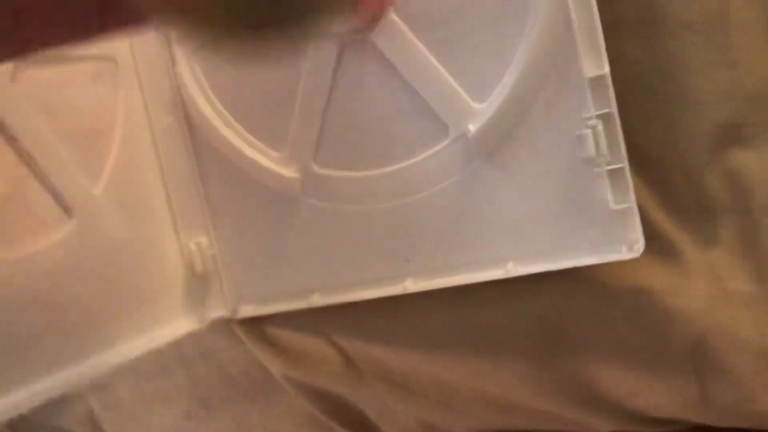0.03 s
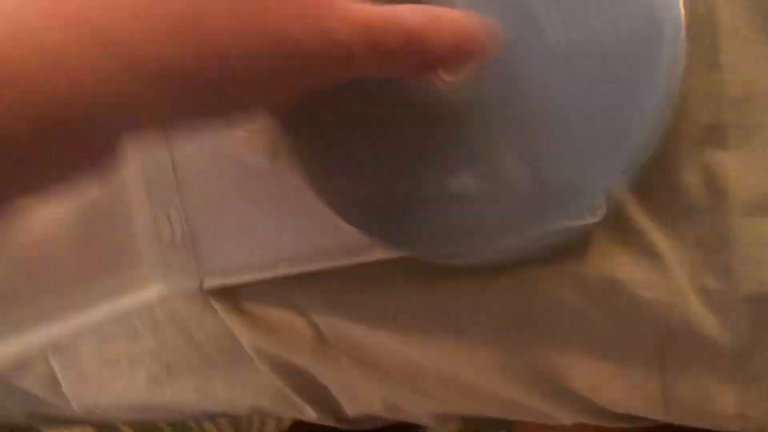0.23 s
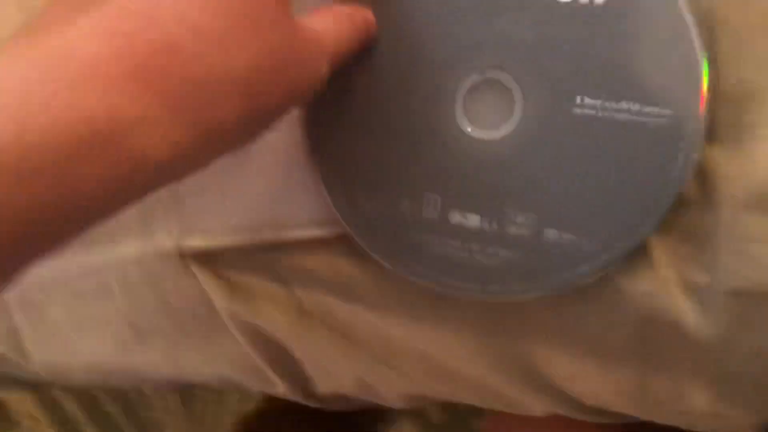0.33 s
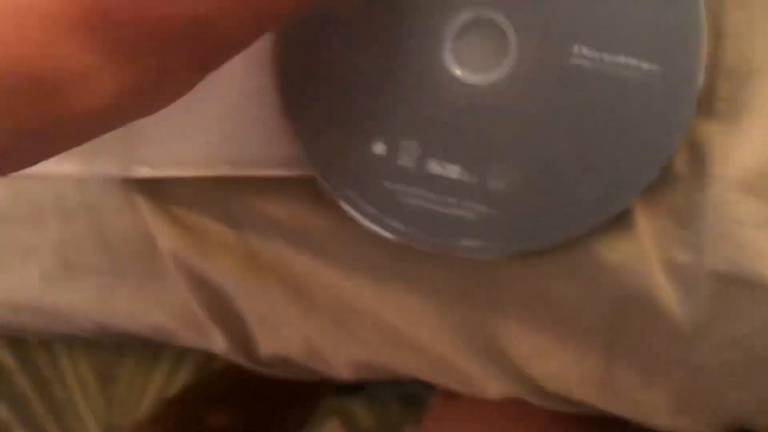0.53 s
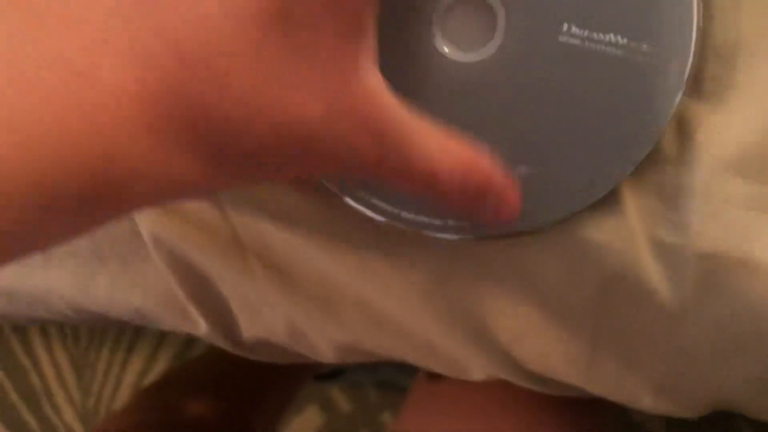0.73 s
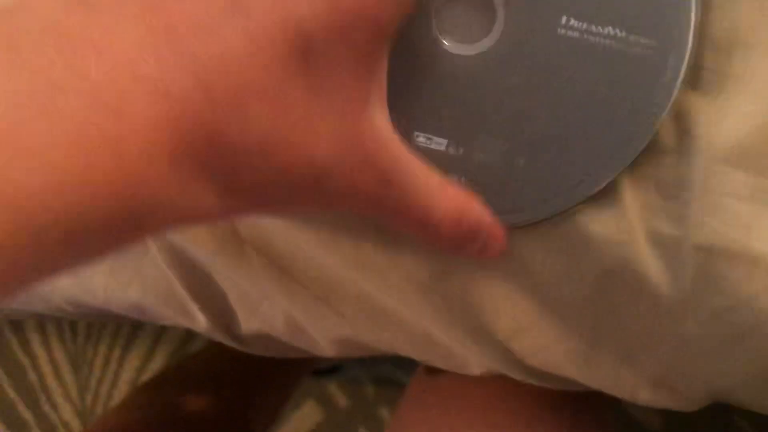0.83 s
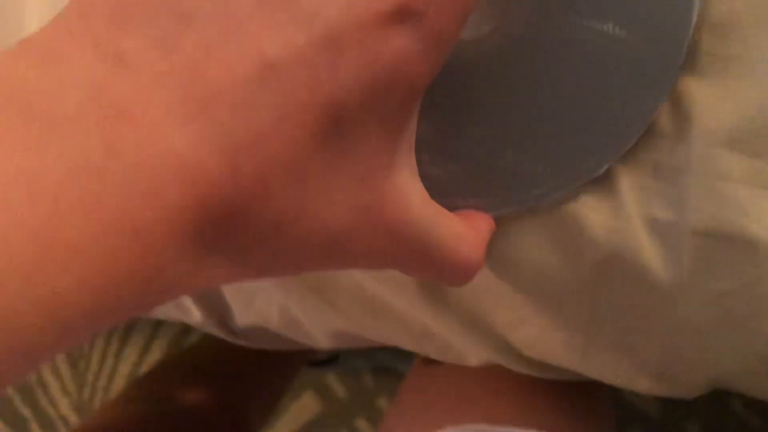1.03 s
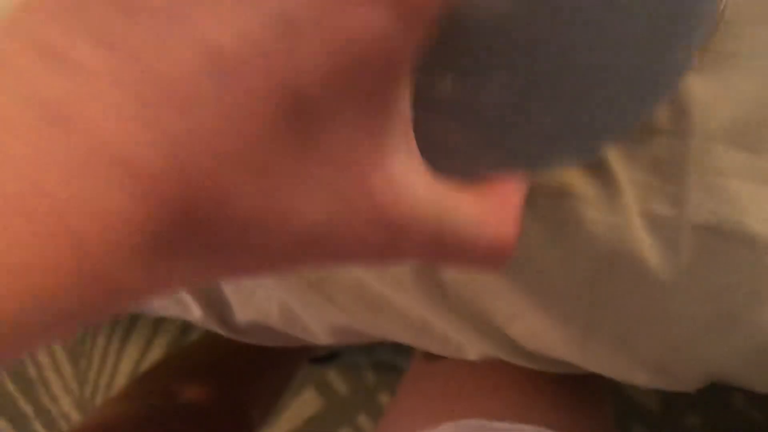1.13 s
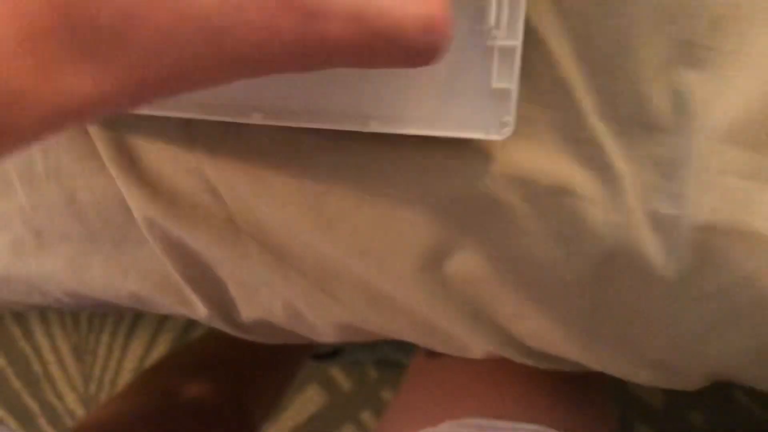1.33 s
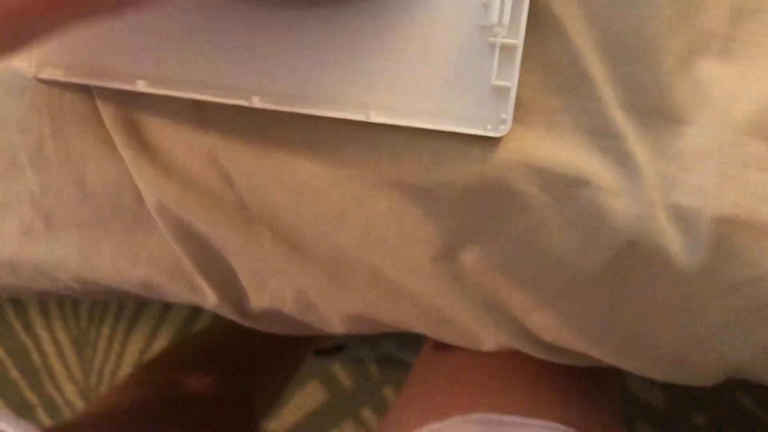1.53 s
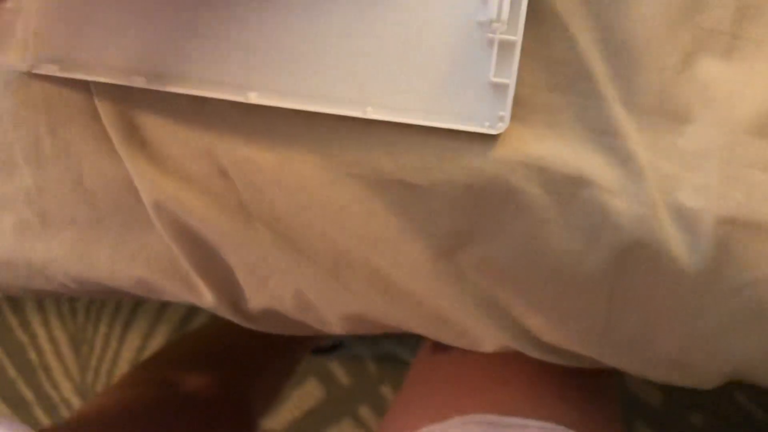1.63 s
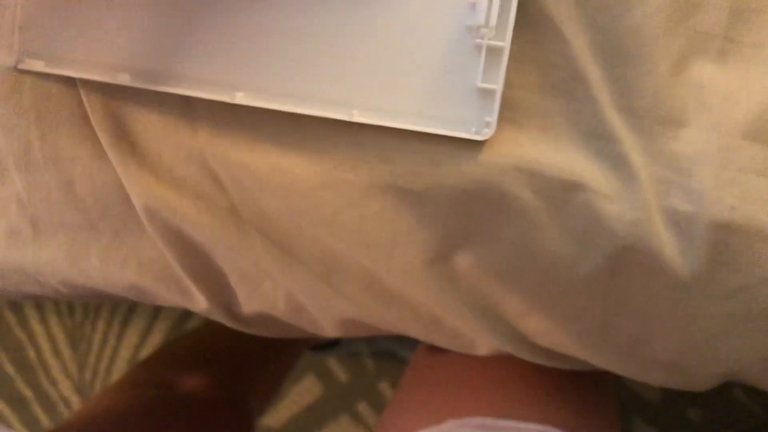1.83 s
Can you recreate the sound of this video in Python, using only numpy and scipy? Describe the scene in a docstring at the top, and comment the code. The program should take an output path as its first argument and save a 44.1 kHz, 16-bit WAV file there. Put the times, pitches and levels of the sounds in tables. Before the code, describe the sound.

A disc snaps out of a plastic case, then is pressed back with crunchy clicks.

```python
"""The hub of an open plastic case lets go of a disc with one sharp snap as a hand pulls it off.
The hub's teeth spring out and buzz, the freed disc rings, and the tray rattles and bumps on a bed.
A second later the disc is pressed back with two crunchy clicks. Fingers tap and slide over the case,
close to the microphone, in a small, quiet room with a faint mains hum."""
import sys
import numpy as np
from scipy import signal
from scipy.fft import rfft, irfft
from scipy.io import wavfile

SR = 44100
rng = np.random.default_rng(int(sys.argv[2]) if len(sys.argv) > 2 else 0)


def waveform_to_disk(signal):
    """Save audio, clipped to [-1, 1], as 16-bit WAV at the path in sys.argv[1]."""
    frames = np.transpose(np.atleast_2d(signal))
    scaled = np.clip(frames, -1, 1) * 32767
    samples = np.round(scaled).astype(np.int16)
    wavfile.write(sys.argv[1], SR, samples)


N = 83790
TIME = np.arange(N) / SR
HIT_TIME = TIME[:SR // 2]

# room noise spectrum: f/Hz, level/dB
AIR_SPECTRUM = [(25, -25), (50, -7.5), (120, -7), (250, -10.5), (450, -14.5), (700, -23), (1300, -29.5),
                (3000, -36.5), (7000, -38.5), (16000, -44)]
# mains hum partials: f/Hz, level/dB
HUM_PARTIALS = [(59, -74), (119, -67.5)]
# fingers and disc sliding on the case: t/s, length/s, level/dB, tilt/(dB/oct)
SLIDE_STROKES = [(-.03, .1, -65.5, -1.5), (0.059, 0.053, -55, 4.5), (0.104, 0.079, -52, -0.5),
                 (0.168, 0.088, -55, 1.5), (0.179, 0.029, -48, 0.5), (0.286, 0.098, -56.5, -0.5),
                 (0.381, 0.064, -57.5, 2.5), (0.814, 0.15, -65.5, 0.5), (0.912, 0.041, -59.5, -0.5),
                 (0.971, 0.058, -67, -0.5), (1.044, 0.047, -70, 2.5), (1.099, 0.17, -76.5, 3),
                 (1.219, 0.19, -66.5, 1.5), (1.478, 0.052, -51.5, -5), (1.546, 0.2, -68, 3),
                 (1.602, 0.025, -42.5, -2), (1.641, 0.017, -48.5, -6), (1.622, 0.062, -68, 1.5),
                 (1.434, .06, -59.5, 0), (1.745, 0.068, -54, -3), (1.778, 0.12, -61.5, 2)]
# rubbed plastic spectrum: f/Hz, level/dB
RUB_SPECTRUM = [(150, -8), (400, 3), (700, -7), (1300, -3), (2000, -2.5), (2550, -2), (3100, -3.5),
                (3700, -6.5), (4700, -11), (5300, -7), (6200, -11.5), (10000, -14.5), (16000, -16.5)]
# spectrum of the disc's rim on the tray: f/Hz, level/dB
RIM_SPECTRUM = [(1500, -18.5), (3200, -10), (4200, 1.5), (4600, -3), (5300, -18), (8000, -12), (9200, -12),
                (11000, -21.5), (16000, -19)]
# plastic contacts: t/s, level/dB, tilt/(dB/oct), t60/s, ring f/Hz, relative ring level/dB
CONTACTS = [(0.1117, -39, 0.5, 0.021, 1240, 9), (.2513, -27, -2.5, 0.045, 6140, 2.5),
            (.269, -43, 8, 0.055, 3650, 11), (0.2854, -24.5, 1.5, .014, 6030, -1.5),
            (0.293, -26, -4.5, 0.026, 3400, -13), (.3328, -37, 0, 0.013, 2410, 1),
            (.452, -33, 0.5, 0.0097, 2596, -0.5), (0.482, -50, -8.5, 0.031, 2650, 5),
            (.872, -49, -7.5, 0.011, 2640, -2.5), (.920, -48, -3.5, 0.012, 2410, 0),
            (0.964, -42, 8, 0.0074, 7130, -3), (1.3775, -19, 3.5, 0.014, 3780, -1.5),
            (1.3803, -16, 0.5, 0.011, 2797, -3), (1.3866, -29, -14.5, .008, 3900, -3),
            (1.401, -46.5, 1.5, 0.01, 1454, 10), (1.4114, -21, -0.5, 0.033, 5510, 0.5),
            (1.4187, -28.5, 5, 0.017, 7440, 2.5), (1.4275, -29.5, 2.5, .04, 2950, -27),
            (1.435, -29, -10.5, 0.019, 4280, -1.5), (1.496, -44.5, -1.5, 0.014, 2600, -5),
            (1.515, -53.5, -1, 0.014, 2600, -8), (1.6081, -37, 0, 0.015, 5250, -1.5),
            (1.619, -41, -8, 0.013, 3050, 5.5), (1.646, -45.5, -5, 0.022, 2450, 8),
            (1.789, -45.5, -2, 0.014, 1480, 1.5), (1.817, -43.5, -16, 0.016, 2120, -7),
            (1.8363, -42.5, -4, 0.034, 2130, 7), (1.845, -38, -6.5, .018, 2790, 1.5),
            (1.8545, -37, -1.5, .018, 2600, 3.5)]
# contact spectrum: f/Hz, level/dB
CONTACT_SPECTRUM = [(150, -10), (600, -6.5), (1300, -0.5), (2000, -1.5), (2700, -2), (3300, -3),
                    (3800, -4.5), (4700, -4), (5500, -7), (7000, -7.5), (10000, -12), (16000, -17)]
# tray bumping on the bedding: t/s, level/dB, push f/Hz
TRAY_BUMPS = [(.114, -31, 277), (.119, -35, 161), (.134, -36.5, 380), (.175, -51, 310), (0.2436, -22, 1090),
              (.249, -24, 622), (0.2551, -17, 333), (.287, -27.5, 516), (0.296, -22.5, 268),
              (0.309, -35, 220), (.334, -59, 332), (.393, -39, 290), (.482, -40.5, 444), (1.381, -15, 740),
              (1.384, -19, 394), (1.389, -25.5, 208), (1.400, -30.5, 385), (1.418, -25, 320),
              (1.429, -27, 330), (1.437, -28, 247), (1.497, -44, 360), (1.519, -42, 254), (1.612, -41, 500),
              (1.626, -39, 298), (1.659, -43, 280), (1.772, -38.5, 338), (1.792, -39, 328),
              (1.818, -43, 353), (1.839, -34, 383), (1.857, -23.5, 355)]
# tray modes, damped by the bedding: f/Hz, level/dB, t60/s
TRAY_MODES = [(100, -22, .08), (146, -17, .1), (192, -18, .07), (245, -19, .065), (310, -16, .1),
              (392, -21, .09), (450, -26, .07), (603, -19, .08), (753, -25, .08), (829, -36, .28)]
# case sinking into the bedding: t/s, level/dB
BED_SAGS = [(.118, -33), (.147, -55), (.25, -41), (.305, -43), (.338, -44.5), (1.43, -36)]
# resonances of the hub's teeth: f/Hz, level/dB
HUB_MODES = [(1950, -4.5), (2620, -2.5), (3720, -4.5), (5350, -6), (7270, -10.5), (10000, -13),
             (11700, -16), (14000, -20)]
# disc left ringing: t/s, level/dB, time until damped/s
DISC_RINGS = [(.243, -27, 0.068), (.453, -54.5, .035), (.481, -57, 0.022)]
# free disc modes: f/Hz, level/dB, t60/s
DISC_MODES = [(944, -2, .2), (1075, -2, .11), (1655, -7, .12), (2000, -4, .11), (2090, -6, .08),
              (2229, -6, .14), (2385, -5, .08), (2650, -4, .07), (3700, -7, .06)]
# room tail decay: f/Hz, t60/s (floored in fade)
TAIL_DECAY = [(150, 0.68), (1000, 0.18), (4000, .36), (14000, -0.09)]
# room tail spectrum: f/Hz, level/dB
TAIL_SPECTRUM = [(60, -2), (300, -4), (1000, 8.5), (3000, -3.5), (7000, -1), (15000, -0.5)]


def amp(db):
    """Decibels to gain."""
    return 10 ** (np.asarray(db) / 20)


def unit(x):
    """Scale to rms 1."""
    return x / np.sqrt(np.mean(x ** 2) + 1e-20)


def along(points, hz):
    """Interpolate (f/Hz, value) points on a log frequency axis."""
    point_hz, values = np.transpose(points)
    return np.interp(np.log(hz + 1), np.log(point_hz + 1), values)


def fade(t60_s, t=HIT_TIME):
    """Exponential decay, 60 dB in t60_s (at least 0.1 ms)."""
    return np.exp(-np.log(1000) * t / np.maximum(t60_s, 1e-4))


def rise(tau_s):
    """Exponential attack."""
    return 1 - np.exp(-HIT_TIME / tau_s)


def add(track, at_s, sound):
    """Mix a sound into a track."""
    start = max(round(at_s * SR), 0)
    track[start:start + len(sound)] += sound[:max(N - start, 0)]


def coloured(x, spectrum, tilt_db_oct=0, pivot_hz=3000, size=4096):
    """Minimum-phase filter of unit energy with a tilted spectrum."""
    hz = np.fft.rfftfreq(size, 1 / SR)
    octaves = np.log2(np.maximum(hz, pivot_hz / 4) / pivot_hz)
    magnitude = unit(amp(along(spectrum, hz) + tilt_db_oct * octaves))
    cepstrum = irfft(np.log(magnitude))
    cepstrum[1:size // 2] *= 2
    cepstrum[size // 2 + 1:] = 0
    impulse = irfft(np.exp(rfft(cepstrum)))
    return signal.fftconvolve(x, impulse)[:len(x)]


def ring(modes, scatter_db=0):
    """Damped modes (f/Hz, level/dB, t60/s) with random level scatter."""
    return sum(amp(db + scatter_db * rng.standard_normal()) * fade(t60_s)
               * np.sin(2 * np.pi * hz * HIT_TIME) for hz, db, t60_s in modes)


def background(air_db=-60.5):
    """Low room noise and faint mains hum."""
    air = unit(coloured(rng.standard_normal(N + SR), AIR_SPECTRUM)[SR:])
    hum = sum(amp(db) * np.sqrt(2) * np.sin(2 * np.pi * (hz * TIME + rng.random()))
              for hz, db in HUM_PARTIALS)
    return amp(air_db) * air + hum


def stroke(at_s, length_s, edge_fraction=.17):
    """Slide envelope: swell, hold, fade."""
    progress = (TIME - at_s) / length_s
    return np.clip(np.minimum(progress, 1 - progress) / edge_fraction, 0, 1)


def friction(spectrum, tilt_db_oct=0, grain_hz=1100, grain_db=3):
    """Rubbing noise of rms 1, made grainy by uneven grip."""
    grip = amp(grain_db * np.interp(TIME * grain_hz, np.arange(N), rng.standard_normal(N)))
    return unit(coloured(grip * rng.standard_normal(N), spectrum, tilt_db_oct))


def slides(rim_db=-61):
    """Fingers rub the case; before the snap the disc's rim hisses along the tray."""
    fingers = sum(amp(db) * stroke(at_s, length_s) * friction(RUB_SPECTRUM, tilt_db_oct)
                  for at_s, length_s, db, tilt_db_oct in SLIDE_STROKES)
    rim = amp(rim_db) * stroke(at_s=-.05, length_s=.13) * friction(RIM_SPECTRUM)
    return fingers + rim


def crack(t60_s, tilt_db_oct):
    """Fast-decaying burst of tiny plastic contacts."""
    grains = np.tanh(2 * rng.standard_normal(len(HIT_TIME)))
    return coloured(grains * fade(t60_s) * rise(tau_s=.0002), CONTACT_SPECTRUM, tilt_db_oct)


def clicks(part_t60_s=.016):
    """Disc, hub and tray click together; the touched part rings briefly."""
    out = np.zeros(N)
    for at_s, db, tilt_db_oct, t60_s, part_hz, part_db in CONTACTS:
        contact = 1.39 * crack(t60_s, tilt_db_oct)
        part = ring([(part_hz, part_db, part_t60_s)])
        add(out, at_s, amp(db) * (contact + part))
    return out


def tray(push_t60_cycles=4.14):
    """Each bump is a short cushioned push that also excites the tray's modes."""
    out = np.zeros(N)
    for at_s, db, hz in TRAY_BUMPS:
        push = np.sin(2 * np.pi * hz * HIT_TIME) * fade(push_t60_cycles / hz) * rise(tau_s=.00051)
        body = ring(TRAY_MODES, scatter_db=1) * rise(tau_s=.0058)
        add(out, at_s, amp(db) * (2 * push + body))
    return out


def bedding(rock_hz=64, t60_s=.15):
    """The whole case rocks on the soft bed under the hand."""
    out = np.zeros(N)
    for at_s, db in BED_SAGS:
        add(out, at_s, ring([(rock_hz, db, t60_s)], scatter_db=2.5) * rise(tau_s=.011))
    return out


def hub(snap_s=.2416, snap_db=-3.5, teeth_t60_s=.0075, buzz_delay_s=.0003, buzz_db=-12):
    """The teeth spring out of the disc's hole and buzz against its edge."""
    out = np.zeros(N)
    teeth = sum((-1) ** k * ring([(hz, db, teeth_t60_s)], scatter_db=1.4)
                for k, (hz, db) in enumerate(HUB_MODES))
    add(out, snap_s, amp(snap_db) * teeth * rise(tau_s=.0001))
    add(out, snap_s + buzz_delay_s, amp(buzz_db) * crack(t60_s=.011, tilt_db_oct=10))
    return out


def disc(finger_t60_s=.051, waver_rad=.55, waver_hz=90):
    """The free disc rings thinly, wavering in the grip, until a finger damps it."""
    out = np.zeros(N)
    for at_s, db, free_s in DISC_RINGS:
        damping = fade(finger_t60_s, np.maximum(HIT_TIME - free_s, 0))
        for hz, mode_db, t60_s in DISC_MODES:
            waver = np.interp(HIT_TIME * waver_hz, np.arange(waver_hz), rng.standard_normal(waver_hz))
            mode = fade(t60_s) * np.sin(2 * np.pi * hz * HIT_TIME + waver_rad * waver)
            add(out, at_s, amp(db + mode_db) * damping * mode)
    return out


def room(x, near_db=-12.5, near_delay_s=.003, tail_db=-20, tail_delay_s=.006):
    """Quick scatter from hand and case, then the room's soft tail."""
    hz, t, noise_stft = signal.stft(rng.standard_normal(SR // 2), SR, nperseg=256)
    decay = fade(along(TAIL_DECAY, hz)[:, None], t)
    tail = signal.istft(noise_stft * decay, SR, nperseg=256)[1]
    tail = coloured(tail, TAIL_SPECTRUM)
    near = rng.standard_normal(len(HIT_TIME)) * fade(t60_s=.021)
    impulse = np.zeros(N)
    add(impulse, near_delay_s, amp(near_db) * near / np.linalg.norm(near))
    add(impulse, tail_delay_s, amp(tail_db) * tail / np.linalg.norm(tail))
    return signal.fftconvolve(x, impulse)[:N]


def scene():
    """Close handling sounds, each with its reflections, over the background; mono."""
    sources = [hub(), clicks(), tray(), disc(), slides(), bedding()]
    return (sum(x + room(x) for x in sources) + background())[None]


def record(dry):
    """Microphone: bass roll-off and steep upper band limit."""
    low_cut_hz, top_hz = 50, 16000
    highpass = signal.butter(3, low_cut_hz, btype="high", fs=SR, output="sos")
    lowpass = signal.ellip(10, .1, 90, top_hz, fs=SR, output="sos")
    return signal.sosfilt(lowpass, signal.sosfilt(highpass, dry))


dry = scene()
out = record(dry)
waveform_to_disk(out)
```